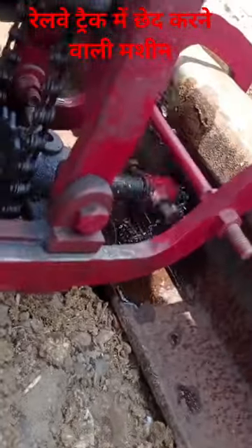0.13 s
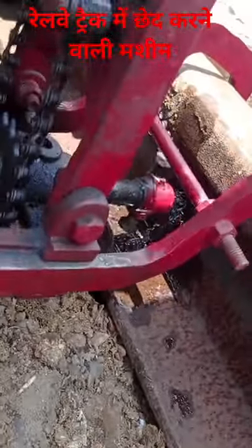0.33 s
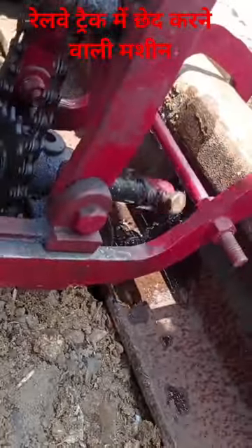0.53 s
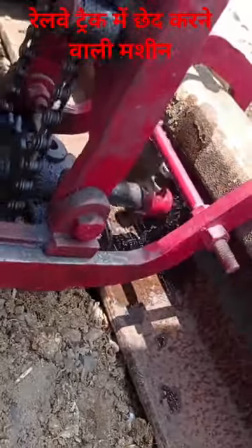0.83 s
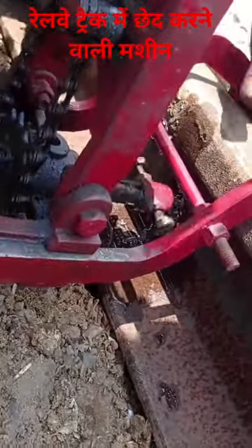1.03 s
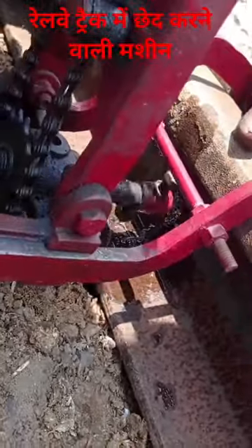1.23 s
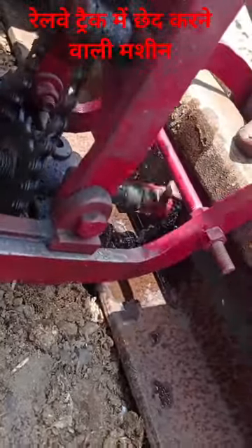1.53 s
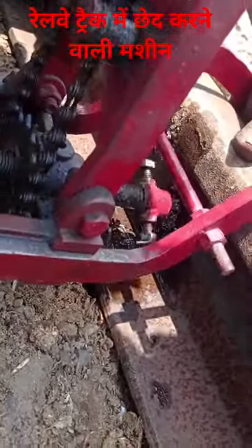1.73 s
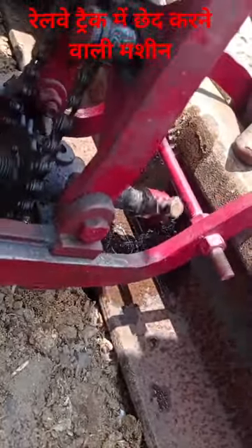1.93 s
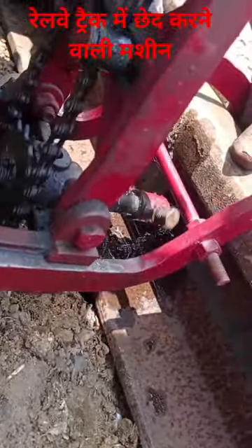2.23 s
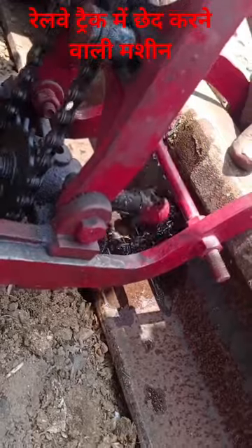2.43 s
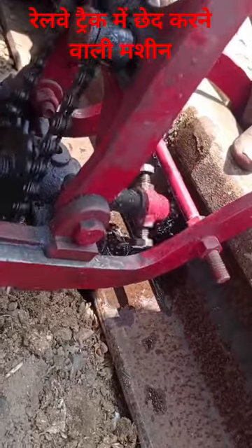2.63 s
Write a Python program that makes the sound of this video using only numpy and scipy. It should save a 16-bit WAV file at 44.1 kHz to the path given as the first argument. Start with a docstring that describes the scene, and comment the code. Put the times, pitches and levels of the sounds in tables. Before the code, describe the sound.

A chain-driven drilling machine rattles fast and bright, grinding into steel rail in uneven pulses outdoors

```python
"""A chain rattles fast and bright while a drill bores into a steel rail, close by and outdoors.
Chain: noise bursts at each roller contact, swelling with the strokes. Bit: a low grind of denser bursts.
Frame: knocks of noise and decaying modes as the load lets go. Steel: short rubbing tones and squeaks.
Rail: a low rumble with dull thuds. A short echo and coloured noise for the air lie behind."""
import sys
import numpy as np
from scipy import signal
from scipy.fft import rfft, irfft, next_fast_len
from scipy.io import wavfile
from scipy.ndimage import map_coordinates

SR = 44100
rng = np.random.default_rng(int(sys.argv[2]) if len(sys.argv) > 2 else 0)


def unload_wav(signal):
    """Save mono or channel-first audio to the path in sys.argv[1] as 16-bit WAV at rate SR, clipped to [-1, 1]."""
    wavfile.write(
        sys.argv[1],
        SR,
        np.round(np.clip(np.atleast_2d(signal).T, -1, 1) * 32767).astype(np.int16),
    )


N = 122157

# Rattle of the chain. Each row: time in seconds, level in dB.
CHAIN_LEVEL = [(0.0, -27.5), (0.01, -33), (0.11, -27.5), (0.21, -43), (0.37, -32.5), (0.45, -33.5),
               (0.47, -29.5), (0.57, -29), (0.65, -45), (0.73, -33), (0.82, -33), (0.91, -27), (1.03, -38),
               (1.04, -34.5), (1.08, -37), (1.12, -35.5), (1.22, -39), (1.23, -31), (1.26, -33.5),
               (1.29, -29), (1.3, -31), (1.33, -28.5), (1.43, -41.5), (1.53, -36.5), (1.54, -31.5),
               (1.59, -42.5), (1.61, -29), (1.63, -38.5), (1.66, -29.5), (1.8, -38.5), (1.87, -35),
               (1.87, -38.5), (2.02, -28.5), (2.17, -38), (2.19, -43.5), (2.24, -36), (2.33, -34),
               (2.34, -42), (2.38, -34), (2.48, -32), (2.49, -39.5), (2.71, -35), (2.71, -36),
               (2.77, -29.5)]
# Speed of the chain. Each row: time in seconds, roller clicks per second.
CHAIN_SPEED = [(0, 114), (.22, 116), (.42, 95), (.53, 122), (.75, 106), (.93, 129), (1.03, 85), (1.15, 109),
               (1.42, 85.6), (1.6, 139), (1.8, 96), (1.9, 111.4), (2.25, 109), (2.45, 137), (2.77, 95)]
# Harder catches of a link on a tooth. Each row: time in seconds, dB over an ordinary click.
CATCHES = [(0.2398, 7), (0.6638, 6.5), (2.7141, 6.5)]
# Colour of the dull click. Each row: frequency in Hz, relative level in dB.
CLICK_COLOUR = [(300, -46.5), (900, -18), (1600, -28), (2100, -5), (2800, -4.5), (3400, 0), (4450, 1.5),
                (4950, -6.5), (5600, -2), (6250, 0.5), (7200, -5.5), (9000, -11.5), (13000, -21),
                (16000, -3)]
# Colour of the bright snap. Each row: frequency in Hz, relative level in dB.
SNAP_COLOUR = [(1500, -20), (4000, -8), (6500, -18.5), (9000, 4.5), (11000, -2), (13700, 1.5), (14800, -12),
               (15800, 6.5)]
# Resonances of the frame. Each row: centre in Hz, width in Hz, relative level in dB.
FRAME_RESONANCES = [(1790, 24, -6), (1976, 20, 2), (2503, 40, 3), (3300, 90, -4), (3480, 90, -1),
                    (3994, 100, -5), (4462, 55, -5), (6077, 50, -5), (6287, 80, -5)]
LINK_JITTER_CLICKS, LINK_SCATTER_DB, INNER_LINK_DB = 0.12, 0.5, -0.5
LOOSE_PER_S, LOOSE_JITTER_CLICKS, LOOSE_SCATTER_DB = 110, 1, 0.54  # slack rollers between link clicks
LOOSE_DB, LOOSE_DB_PER_LOAD_DB = -7, 0.56  # their weight against the links, greater under load
CLICK_DB, CLICK_T60_S, CLICK_RISE_S = 0.5, 0.021, 0.00019
SNAP_DB, SNAP_T60_S = -14.5, 0.005
SNAP_DB_PER_LOAD_DB = 0.92  # the snap swings a little less than the rattle
FRAME_DB = -6

# Cutting strokes. Each row: peak time in seconds, level in dB, rise in seconds, fall in seconds.
STROKES = [(0.114, -39, 0.19, 0.049), (0.561, -38.5, 0.2, 0.08), (.945, -41, 0.24, 0.12),
           (1.35, -38, 0.1, 0.086), (1.692, -36, 0.055, 0.072), (2.07, -39, 0.12, 0.11),
           (2.449, -43, 0.074, 0.043), (2.749, -39, 0.062, 0.058)]
# Colour of the grind. Each row: frequency in Hz, relative level in dB.
GRIND_COLOUR = [(40, -40), (130, -22), (290, -10.5), (345, -4.5), (420, 0.5), (496, 3), (580, -2), (700, 2),
                (900, -8), (1040, -1.5), (1200, -4), (1325, -2), (1550, -21.5), (1790, -8), (3000, -1),
                (8000, -54.5)]
STROKE_RANGE_DB, IDLE_DB = 18.5, -58.5  # range covered in one rise or fall; floor under the strokes
GRIND_PER_S, GRIND_JITTER_CONTACTS, GRIND_SCATTER_DB, GRIND_T60_S = 190, 0.4, 3.5, 0.057

# Knocks of the frame. Each row: time in seconds, level in dB before the band-pass,
# brightness in dB per octave, t60 of the noise in seconds.
KNOCKS = [(0.139, -29.5, -5.5, .05), (.239, -41.5, 3, 0.044), (.572, -26, 0, 0.067), (.955, -27, 2, 0.041),
          (1.036, -25.5, -1, 0.027), (1.365, -26, 0, .06), (1.679, -63, 11, 0.056),
          (2.121, -30.5, -0.5, 0.043), (2.42, -36, -2, .05), (2.452, -32, -1.5, 0.14),
          (2.731, -32, 0.5, 0.063)]
# Colour of the knock noise. Each row: frequency in Hz, relative level in dB.
KNOCK_COLOUR = [(25, -45), (100, 3), (250, -14), (490, 8), (600, 2), (700, 8), (1000, 3), (1400, -2),
                (1800, 2.5), (2600, 2), (4000, 5), (9000, -10)]
# Modes of the knocked frame. Each row: frequency in Hz, relative level in dB.
CLANK_MODES = [(496, -2), (696, -3), (1040, -10.5), (1325, -5), (1560, -6), (1790, 1), (2310, 1)]
CLANK_DB, CLANK_SCATTER_DB, CLANK_T60_RATIO = -7.5, 2.1, 1.3
KNOCK_BAND_HZ = (310, 3200)

# Rubbing tones. Each row: start in seconds, length in seconds, level in dB before flutter, pitch in Hz.
RUBS = [(0.019, 0.085, -37, 1982), (.15, 0.077, -43, 1970), (0.334, 0.031, -36, 1985),
        (0.449, 0.084, -33, 1980), (.45, 0.068, -43, 2517), (0.566, 0.045, -37, 1954),
        (0.742, 0.067, -35, 1986), (0.753, 0.37, -48, 2510), (.96, 0.076, -46, 1985),
        (1.131, 0.12, -42, 2444), (1.224, 0.031, -34.5, 1976), (1.278, 0.032, -38, 2000),
        (1.536, 0.036, -43, 1990), (1.592, 0.063, -36.5, 1985), (1.9, 0.042, -38, 1966),
        (2.025, 0.065, -39, 1983)]
# High squeaks of dry steel. Each row: start in seconds, length in seconds, level in dB before flutter,
# pitch in Hz.
SQUEAKS = [(.472, .016, -47, 12700), (1.264, .02, -39, 13200), (1.84, 0.015, -40, 10990)]
RUB_WANDER_HZ, SQUEAK_WANDER_HZ, RUB_FLUTTER_DB = 24, 164, 2.5

# Rumble of the rail. Each row: time in seconds, level in dB.
RUMBLE_LEVEL = [(0.0, -52), (0.11, -43), (0.22, -62), (0.29, -65), (0.37, -53.5), (0.45, -57), (0.49, -43),
                (0.54, -40), (0.65, -60), (0.75, -51), (0.77, -65.5), (0.95, -41), (1.03, -60),
                (1.09, -47.5), (1.25, -65.5), (1.3, -41), (1.36, -50), (1.46, -66), (1.56, -69), (1.6, -54),
                (1.63, -53.5), (1.68, -48.5), (1.7, -46), (1.74, -49.5), (1.92, -68), (2.02, -47),
                (2.13, -50), (2.2, -62), (2.23, -56), (2.32, -64), (2.44, -47.5), (2.51, -63), (2.53, -59),
                (2.65, -77), (2.68, -56), (2.77, -44.5)]
# Colour of the rumble. Each row: frequency in Hz, relative level in dB.
RUMBLE_COLOUR = [(25, -19), (50, -30), (80, -11), (105, -1.5), (130, -1), (200, 2), (270, 5), (300, 2.5),
                 (350, -5.5), (490, -3.5), (620, -18.5), (1200, -18.5), (4000, -57)]
# Dull thuds through the rail. Each row: start in seconds, level in dB before rise, decay and doubling,
# pitch in Hz.
THUDS = [(0.102, -35, 132), (0.233, -50.5, 87), (0.656, -48, 80.54), (0.724, -53, 90.2), (1.279, -38, 113),
         (1.671, -37, 133), (2.291, -54, 91), (2.424, -35.5, 125), (2.68, -47, 85.4)]
RUMBLE_SCATTER_DB, THUD_RISE_S, THUD_T60_S = 3.3, 0.013, 0.1

# Colour of the echo. Each row: frequency in Hz, gain in dB.
ECHO_COLOUR = [(25, -17), (80, -4), (270, 4), (700, 2), (1800, -4), (4000, 0), (16000, -5.5)]
ECHO_T60_S, ECHO_DB = 0.14, -11
# Colour of the outdoor air. Each row: frequency in Hz, relative level in dB.
AIR_COLOUR = [(25, 2), (50, 0), (85, 20), (130, -7), (270, -29), (500, 2.5), (1400, -16), (3500, 28),
              (9000, -22), (16000, -13)]
AIR_DB, AIR_WOBBLE_DB = -48, 0.8
TOP_HZ = 15720


def amp(db):
    """Amplitude factor of a level in dB."""
    return 10 ** (np.asarray(db) / 20)


def unit(x):
    """x scaled to an RMS of 1."""
    return x / np.sqrt(np.mean(x ** 2) + 1e-20)


def clock():
    """Time of every sample in seconds."""
    return np.arange(N) / SR


def curve(rows):
    """One value per sample, linear between (s, value) rows."""
    return np.interp(clock(), *np.transpose(rows))


def wobble(knots_per_s):
    """A smooth random curve through evenly spaced knots."""
    return map_coordinates(rng.standard_normal(4096), [clock() * knots_per_s], mode="wrap")


def filtered(x, response):
    """x times a complex response of frequency."""
    m = 2 * next_fast_len(N)
    return irfft(rfft(x, m) * response(np.fft.rfftfreq(m, 1 / SR)), m)[:N]


def coloured(x, points, tilt_db_per_octave=0):
    """x through a causal minimum-phase filter of (Hz, dB) points, scaled to unit RMS."""
    def response(hz):
        f, db = np.transpose(points)
        tilted_db = db + tilt_db_per_octave * np.log2(f / f[0])
        gain_db = np.interp(np.log(hz + 1), np.log(f), tilted_db)
        cepstrum = irfft(np.log(amp(gain_db)))
        half = len(cepstrum) // 2
        cepstrum[1:half] *= 2  # fold onto positive times
        cepstrum[half + 1:] = 0
        return np.exp(rfft(cepstrum))
    return unit(filtered(x, response))


def contacts(per_s, jitter, scatter_db, second_db=0):
    """Energy of a train of contacts, uneven in time and size; every second one may be weaker."""
    draws = np.clip(rng.standard_normal((2048, 2)), -2, 2)
    k = np.arange(len(draws))
    passed = np.cumsum(per_s * np.ones(N)) / SR
    at = np.searchsorted(passed, k + jitter * draws[:, 0])
    energy = amp(scatter_db * draws[:, 1] + second_db * (k % 2)) ** 2
    keep = (at > 0) & (at < N)
    return np.bincount(at[keep], energy[keep], N)


def bursts(energy, t60_s, rise_s=1e-5):
    """Every contact sets off a dying burst of noise; the sum has unit RMS."""
    t = clock()[:SR // 4]
    decay = (amp(-60 * t / t60_s) * (1 - np.exp(-t / rise_s))) ** 2
    power = np.abs(signal.fftconvolve(energy, decay)[:N])
    return unit(np.sqrt(power) * rng.standard_normal(N))


def chain():
    """Rollers strike the sprocket teeth: a snap, a duller click and the ring of the frame."""
    level_db = curve(CHAIN_LEVEL)
    load_db = level_db - level_db.mean()
    loose_weight = amp(LOOSE_DB + LOOSE_DB_PER_LOAD_DB * load_db) ** 2
    hits = contacts(curve(CHAIN_SPEED), LINK_JITTER_CLICKS, LINK_SCATTER_DB, INNER_LINK_DB)
    hits += loose_weight * contacts(LOOSE_PER_S, LOOSE_JITTER_CLICKS, LOOSE_SCATTER_DB)
    for s, db in CATCHES:
        hits[min(round(s * SR), N - 1)] += amp(db) ** 2
    hits /= 1 + loose_weight  # loose rollers shift the balance, not the level

    def frame(f):
        return sum(amp(db) * 1j * f * width / (centre ** 2 - f * f + 1j * f * width)
                   for centre, width, db in FRAME_RESONANCES)

    click = amp(CLICK_DB) * coloured(bursts(hits, CLICK_T60_S, CLICK_RISE_S), CLICK_COLOUR)
    snap_gain = amp(SNAP_DB + (SNAP_DB_PER_LOAD_DB - 1) * load_db)
    snap = snap_gain * coloured(bursts(hits, SNAP_T60_S), SNAP_COLOUR)
    ring = amp(FRAME_DB) * unit(filtered(bursts(hits, CLICK_T60_S), frame))
    return (click + snap + ring) * amp(level_db)


def grinding():
    """The bit chatters in the rail, building up and letting go once a stroke."""
    t = clock()
    load = amp(IDLE_DB)
    for s, db, rise_s, fall_s in STROKES:
        from_peak = np.maximum((s - t) / rise_s, (t - s) / fall_s)
        load = load + amp(db - STROKE_RANGE_DB * from_peak)
    hits = contacts(GRIND_PER_S, GRIND_JITTER_CONTACTS, GRIND_SCATTER_DB)
    return load * coloured(bursts(hits, GRIND_T60_S), GRIND_COLOUR)


def knocks():
    """Play in the frame closes with a short clank: a noise crunch and ringing modes."""
    out = np.zeros(N)
    pivot_hz = CLANK_MODES[2][0]
    for s, db, tilt, t60_s in KNOCKS:
        t = np.maximum(clock() - s, 0)
        decay = (t > 0) * amp(-60 * t / t60_s)
        noise = coloured(decay * rng.standard_normal(N), KNOCK_COLOUR, tilt)
        crunch = np.sqrt(np.mean(decay ** 2)) * noise
        ring = np.zeros(N)
        for k, (hz, mode_db) in enumerate(CLANK_MODES):
            gain_db = mode_db + tilt * np.log2(hz / pivot_hz) + rng.normal(0, CLANK_SCATTER_DB)
            ring += (-1) ** k * amp(gain_db) * np.sin(2 * np.pi * hz * t)
        ring *= amp(CLANK_DB - 60 * t / (CLANK_T60_RATIO * t60_s))
        out += amp(db) * (crunch + ring)
    band = signal.butter(2, KNOCK_BAND_HZ, "bandpass", fs=SR, output="sos")
    return signal.sosfilt(band, out)


def tones(rows, wander_hz):
    """Short friction tones, unsteady in pitch and level, that swell and fade."""
    t, out = clock(), np.zeros(N)
    wander = wander_hz * wobble(200)
    flutter = amp(RUB_FLUTTER_DB * wobble(110))
    for s, length_s, db, hz in rows:
        swell = np.sin(np.pi * np.clip((t - s) / length_s, 0, 1))
        phase = 2 * np.pi * np.cumsum(hz + wander) / SR
        out += amp(db) * swell * np.sin(phase)
    return out * flutter


def rubbing():
    """Steel rubs on steel: modes of the frame sing briefly, dry spots squeak."""
    return tones(RUBS, RUB_WANDER_HZ) + tones(SQUEAKS, SQUEAK_WANDER_HZ)


def rumble():
    """The rail and the machine's bed shudder under the strokes, with a few dull thuds."""
    hits = contacts(GRIND_PER_S, GRIND_JITTER_CONTACTS, RUMBLE_SCATTER_DB)
    out = amp(curve(RUMBLE_LEVEL)) * coloured(bursts(hits, GRIND_T60_S), RUMBLE_COLOUR)
    for s, db, hz in THUDS:
        t = np.maximum(clock() - s, 0)
        envelope = amp(db - 60 * t / THUD_T60_S) * (1 - np.exp(-t / THUD_RISE_S))
        out += 2 * envelope * np.sin(2 * np.pi * hz * t)
    return out


def echo(x, count=4):
    """A short answer of rail and ballast: several noise tails in slowly varying mixture."""
    t, out = clock()[:SR // 4], np.zeros(N)
    weights = np.array([wobble(7) for _ in range(count)])
    weights /= np.linalg.norm(weights, axis=0)
    for weight in weights:
        tail = rng.standard_normal(len(t)) * amp(-60 * t / ECHO_T60_S)
        out += weight * signal.fftconvolve(x, tail / np.linalg.norm(tail))[:N]
    return filtered(out, lambda hz: amp(np.interp(hz, *np.transpose(ECHO_COLOUR))))


def outdoor_air():
    """Coloured noise with a slightly wavering level."""
    level_db = AIR_DB + AIR_WOBBLE_DB * wobble(9.63)
    return amp(level_db) * coloured(rng.standard_normal(N), AIR_COLOUR)


def scene():
    """The machine, its short echo and the outdoor air."""
    machine = chain() + grinding() + rumble() + knocks() + rubbing()
    air = outdoor_air()
    return (machine + amp(ECHO_DB) * echo(machine) + air)[None]


def record(dry):
    """Band limit: a 200 Hz wide linear slope centred on TOP_HZ."""
    return filtered(dry[0], lambda hz: np.clip((TOP_HZ - hz) / 200 + 0.5, 0, 1))[None]


dry = scene()
out = record(dry)
unload_wav(out)
```